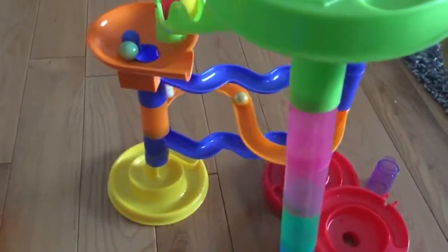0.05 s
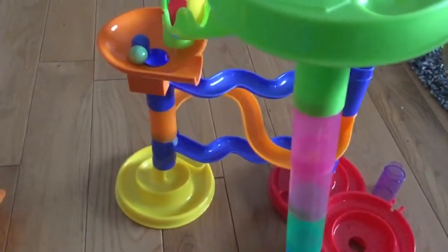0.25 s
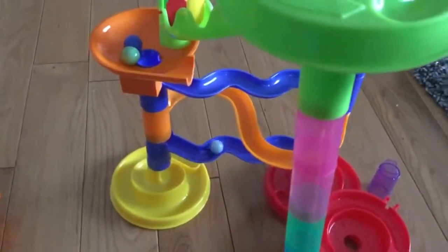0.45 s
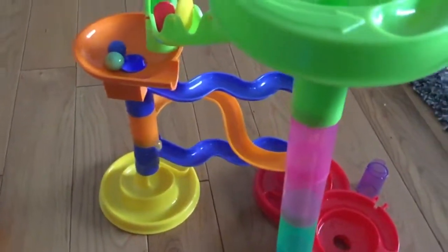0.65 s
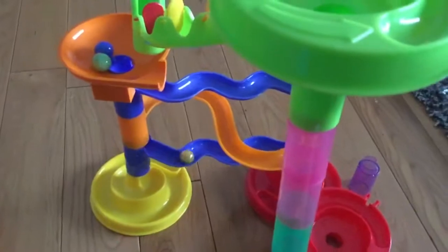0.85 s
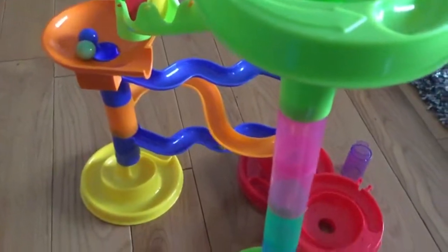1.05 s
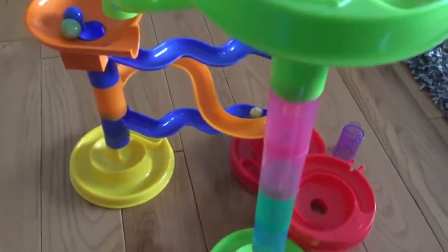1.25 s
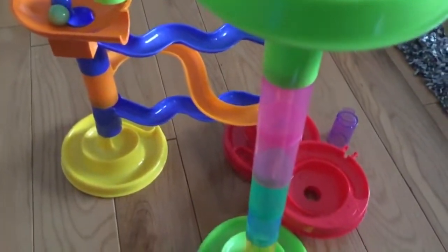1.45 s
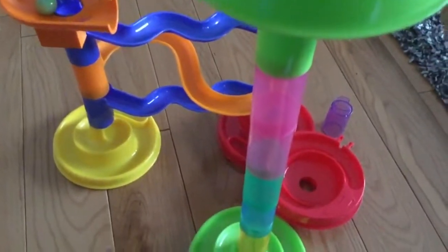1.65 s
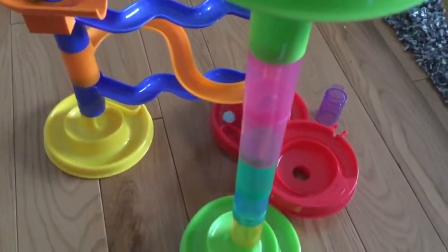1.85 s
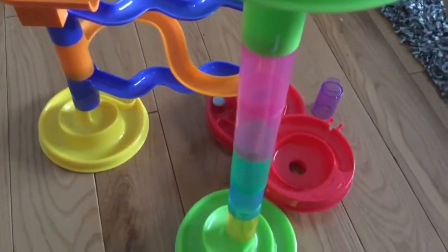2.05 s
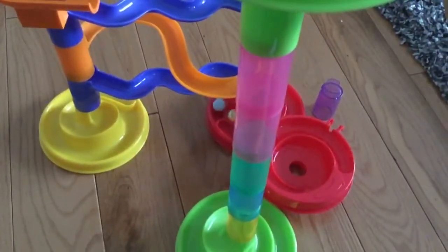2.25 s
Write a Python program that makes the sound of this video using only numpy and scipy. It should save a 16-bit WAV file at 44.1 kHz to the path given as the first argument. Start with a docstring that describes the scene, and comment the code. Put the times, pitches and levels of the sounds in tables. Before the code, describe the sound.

Two glass marbles roll through a plastic run, heard from close above. Sharp clacks on a ramp come at about 0.2 and 0.6 seconds, over soft rolling. The marbles rattle down a hollow column around 1 and 1.4 seconds, then clatter in a dish from 1.5 seconds, settling with a few hollow knocks by about 2.1. The room echoes briefly over a faint low rumble.

```python
"""Two marbles on a plastic track

One after the other, two glass marbles drop onto a wavy ramp, roll along it, rattle down a hollow
column and land in a dish, heard from close above. Each knock makes the thin plastic ring briefly,
and rolling drums it softly. A room with a wooden floor echoes over a low rumble."""
import sys
import numpy as np
from scipy import signal
from scipy.fft import rfft, irfft
from scipy.io import wavfile

SR = 44100
rng = np.random.default_rng(int(sys.argv[2]) if len(sys.argv) > 2 else 0)


def to_wav(sig):
    """Store sig (one row per channel, or 1-D mono) as 16-bit WAV at the path in sys.argv[1].

    Samples outside -1..1 are clipped; the rate is SR.
    """
    pcm = np.clip(np.atleast_2d(sig), -1, 1) * 32767
    pcm = np.round(pcm).astype(np.int16)
    wavfile.write(sys.argv[1], SR, pcm.T)  # frames by channels


N = 101429


def undb(db):
    """Turn decibels into a number to multiply by."""
    return 10 ** (np.asarray(db) / 20)


def unit(x):
    """Scale a sound to an average strength (rms) of 1."""
    return x / np.sqrt(np.mean(x ** 2) + 1e-20)


def fade(t, t60):
    """Die away, falling by 60 dB in the fade time t60."""
    return np.exp(-np.log(1000) * t / t60)


def band(x, lo_hz, hi_hz):
    """Keep the part of a sound between two frequencies."""
    return signal.sosfilt(signal.butter(3, [lo_hz, hi_hz], "band", fs=SR, output="sos"), x)


def colour(x, points):
    """Shape the tone along a curve of (frequency [Hz], level [dB]) points."""
    hz, db = np.array(points).T
    f = np.maximum(np.fft.rfftfreq(len(x), 1 / SR), 1)
    return irfft(rfft(x) * undb(np.interp(np.log(f), np.log(hz), db)), len(x))


# the tone of the still air (frequency [Hz], relative level [dB])
AIR_TONE = [(25, -35.5), (40, -24.5), (56, -5), (72, 6), (92, -9.5), (125, -1), (200, -11.5), (350, -11.5),
            (550, -26), (1200, -26), (3000, -35), (8000, -54.5), (13000, -44), (15000, -72)]


def air_rumble(level_db=-58):
    """The air in the room makes a faint, low, steady noise."""
    return undb(level_db) * unit(colour(rng.standard_normal(N), AIR_TONE))


# the room's echo (frequency [Hz], level against the sound going in [dB], fade time [s])
ROOM_ECHO = [(202, -2, 0.91), (459, -12, 0.55), (800, -10, .43), (1497, -8.5, 0.43), (2780, -10, 0.45),
             (5500, -18.5, 0.73), (8500, -8.5, 0.32), (14000, -19.5, .3)]


def room(x, delay_s=0.0041, build_s=.012, early_db=-14, early_s=0.032):
    """Early echoes bounce off floor and toy, then blur into a tail whose lows last longest."""
    t = np.arange(SR * 3 // 4) / SR
    hz, db, t60 = np.array(ROOM_ECHO).T
    edges = np.geomspace(140, 17000, 15)
    build = 1 - np.exp(-np.maximum(t - delay_s, 0) / build_s)
    f = np.fft.rfftfreq(len(t), 1 / SR)
    spectrum = rfft(rng.standard_normal(len(t)))
    tail = 0
    for lo, hi in zip(edges, edges[1:]):
        log_centre = np.log(lo * hi) / 2
        envelope = unit(build * fade(t, np.interp(log_centre, np.log(hz), t60)))
        noise = irfft(spectrum * ((f >= lo) & (f < hi)), len(t))
        tail += undb(np.interp(log_centre, np.log(hz), db)) * envelope * noise
    early = undb(early_db) * unit(rng.standard_normal(len(t)) * np.sqrt(t) * np.exp(-(t / early_s) ** 2))
    return signal.fftconvolve(x, (tail + early) / np.sqrt(len(t)))[:N]


def resonate(taps, peaks):
    """Tapped plastic rings at its own pitches; filtering twice makes each one stand out."""
    out = 0
    for hz, width, db in peaks:
        b, a = signal.iirpeak(hz, hz / width / 1.17, fs=SR)
        out += undb(db) * unit(signal.lfilter(b, a, signal.lfilter(b, a, taps)))
    return unit(out)


# how loud the rolling is (time [s], low ring level [dB], middle ring level [dB])
ROLL_LEVELS = [(0, -50.5, -51), (.18, -52.5, -60), (.4, -51.5, -54), (0.492, -45.5, -49), (.54, -54.5, -55),
               (.7, -45.5, -50.5), (.9, -51.5, -56), (1.08, -46, -45), (1.22, -51.5, -55),
               (1.275, -43, -62), (1.315, -54, -62.5), (1.345, -50, -54), (1.45, -54, -64),
               (1.6, -42.5, -46.5), (1.78, -54.5, -50), (1.88, -53.5, -61.5), (2.0, -44, -38),
               (2.11, -44.5, -69.5), (2.18, -63.5, -65), (2.3, -70, -81.5)]
# the low and middle rings of the plastic (pitch [Hz], rough width [Hz], relative level [dB])
LOW_RING = [(788.6, 112, 3.5), (706, 110, -11)]
MIDDLE_RING = [(1015, 54, 4), (1357, 196, 11.5), (1515, 350, 8), (2313, 410, 2)]
# the tone of the rolling hiss (frequency [Hz], relative level [dB])
HISS_TONE = [(1500, -16), (2600, 4.5), (4500, -3.5), (7500, -6.5), (10000, -12.5), (13000, -21.5),
             (15000, -47)]


def rolling(taps_per_s=1200, spread_db=3, hiss_db=-10.5):
    """Tiny uneven taps under the rolling marbles drum the plastic and hiss faintly."""
    t = np.arange(N) / SR
    times, low_db, middle_db = np.array(ROLL_LEVELS).T
    sizes = undb(spread_db * np.minimum(rng.exponential(size=N), 4))
    taps = (rng.random(N) < taps_per_s / SR) * sizes * rng.choice([-1, 1], N)
    hiss = undb(hiss_db) * unit(colour(unit(taps) + rng.standard_normal(N), HISS_TONE))
    low = undb(np.interp(t, times, low_db)) * resonate(taps, LOW_RING)
    middle = undb(np.interp(t, times, middle_db)) * (resonate(taps, MIDDLE_RING) + hiss)
    return low + middle


# the dish's low notes (time [s], pitch [Hz], level [dB], fade time [s])
DISH_BOOMS = [(1.986, 326, -33.5, 0.049), (2.025, 294, -37, 0.16), (2.112, 800, -24.5, 0.049)]


def dish_booms(swell_s=0.003):
    """As the second marble settles, low notes of the dish swell and die away."""
    out = 0
    for start, hz, db, t60 in DISH_BOOMS:
        age = np.maximum(np.arange(N) / SR - start, 0)
        swell = 1 - np.exp(-age / swell_s)
        out += undb(db) * swell * fade(age, t60) * np.sin(2 * np.pi * hz * age)
    return out


# the borders of a knock's four bands, called low, middle, treble and top (frequency [Hz])
BAND_BORDERS = [200, 1000, 2700, 6300, 16000]
# the crack of many short-lived notes, a row per band (level against the ring [dB], fade time [s])
KNOCK_CRACK = [(-17.5, .014), (-5.5, 0.013), (-4, 0.01), (-1.5, 0.011)]
# the range of crack and click, a row per band (from [Hz], to [Hz])
CRACK_RANGES = [(350, 1030), (1000, 2300), (2700, 5580), (6000, 11400)]


def knock(levels_db, notes, clicks_db, attack_s=0.00036, lag_at_1khz_s=0.000325):
    """A marble hits the plastic: a click, a short crack and the ring of that part's own notes."""
    t = np.arange(SR // 8) / SR
    hz, db, t60 = np.array(notes).T
    note_band = np.searchsorted(BAND_BORDERS, hz) - 1
    hz = hz * (1 + .018 * rng.standard_normal(len(hz)))  # no two knocks ring quite alike
    gain = undb(db + 1.5 * rng.standard_normal(len(hz))) * rng.choice([-1, 1], len(hz))
    out = 0
    for k, (crack_db, crack_t60) in enumerate(KNOCK_CRACK):
        lo, hi = BAND_BORDERS[k:k + 2]
        lag_s = lag_at_1khz_s * 1000 / np.sqrt(lo * hi)  # low bending waves travel more slowly
        age = np.maximum(t - lag_s, 0)
        rise = 1 - np.exp(-age / attack_s)
        in_band = note_band == k
        tones = np.sin(2 * np.pi * hz[in_band, None] * age) * fade(age, t60[in_band, None])
        ring = unit(rise * (gain[in_band] @ tones))
        burst = rng.standard_normal(len(t)) * rise * fade(age, crack_t60)
        crack = undb(crack_db) * unit(band(burst, *CRACK_RANGES[k]))
        spike = signal.unit_impulse(len(t), np.argmax(age > 0)) * rng.choice([-1, 1])
        click = undb(clicks_db[k]) * unit(band(spike, *CRACK_RANGES[k]))
        out += undb(levels_db[k]) * unit(ring + crack + click)
    return out * np.sqrt(.008 * SR / len(t))  # levels count as if the knock were packed into 8 ms


def knocks(hits, notes, clicks_db):
    """All the knocks on one part; where and how hard a marble hits sets the four band levels."""
    out = np.zeros(N + SR)
    for start, *levels_db in hits:
        sound = knock(levels_db, notes, clicks_db)
        i = int(start * SR)
        out[i:i + len(sound)] += sound
    return out[:N]


# knocks on the ramp (time [s], low [dB], middle [dB], treble [dB], top [dB])
RAMP_HITS = [(0.0275, -46, -54, -55, -59), (0.1472, -46, -45, -58, -69), (0.2351, -25, -24, -17, -25),
             (0.2569, -30, -32, -36, -44), (0.2929, -39, -39, -34, -38), (0.4881, -48, -47, -61, -72),
             (0.5545, -29, -34, -41, -44), (0.5949, -24, -25, -18, -29), (0.6099, -28, -30, -27, -31),
             (0.6459, -32, -31, -39, -46), (0.6673, -35, -39, -49, -55), (0.8781, -43, -43, -54, -63),
             (1.267, -42, -54, -68, -72)]
# the ramp's own notes (pitch [Hz], relative level [dB], fade time [s])
RAMP_NOTES = [(392, -15, 0.045), (798, 8, 0.035), (1120, 7.5, 0.012), (1419, 0, 0.017), (1930, -10, 0.0047),
              (2416, -5, 0.037), (2914, -2, 0.017), (4200, 6, 0.0079), (4990, 3, .011), (5683, 10, 0.0075),
              (6670, 5, 0.0097), (8200, 5, .008)]


def ramp(clicks_db):
    """The marbles drop onto the wavy ramp and bump along it."""
    return knocks(RAMP_HITS, RAMP_NOTES, clicks_db)


# knocks in the column (time [s], low [dB], middle [dB], treble [dB], top [dB])
COLUMN_HITS = [(0.1203, -50, -50, -62, -59), (0.1386, -57, -58, -55, -64), (0.202, -39, -35, -34, -36),
               (0.5517, -43, -40, -36, -35), (0.5768, -38, -33, -35, -34), (0.9171, -40, -34, -38, -38),
               (0.9368, -48, -35, -45, -47), (0.9583, -30, -23, -28, -29), (0.976, -47, -37, -45, -46),
               (0.9875, -48, -36, -46, -47), (1.0109, -35, -33, -35, -30), (1.042, -36, -34, -39, -39),
               (1.0605, -44, -36, -52, -50), (1.0638, -37, -33, -40, -42), (1.1044, -38, -34, -49, -47),
               (1.1837, -48, -43, -57, -68), (1.3866, -65, -42, -60, -60), (1.3942, -34, -34, -37, -39),
               (1.4101, -58, -37, -49, -55), (1.4215, -39, -39, -46, -47), (1.4266, -27, -20, -28, -29),
               (1.4435, -38, -36, -43, -43), (1.4565, -44, -34, -45, -44)]
# the column's own notes (pitch [Hz], relative level [dB], fade time [s])
COLUMN_NOTES = [(400, -20, 0.054), (656, 0.5, 0.027), (800, 1.5, 0.027), (1170, -5.5, .02),
                (1323, 3, 0.019), (2218, -5, 0.023), (3317, 1, 0.0094), (4160, -4.5, 0.016),
                (5345, -2, 0.021), (6180, 3.5, 0.01), (7520, -9, 0.01), (8570, -16.5, 0.011)]


def column(clicks_db):
    """The marbles rattle down the hollow column and make its walls ring."""
    return knocks(COLUMN_HITS, COLUMN_NOTES, clicks_db)


# knocks in the dish (time [s], low [dB], middle [dB], treble [dB], top [dB])
DISH_HITS = [(1.476, -34, -35, -37, -33), (1.4928, -44, -37, -30, -29), (1.5036, -47, -32, -36, -37),
             (1.5116, -39, -32, -33, -34), (1.5245, -50, -36, -43, -43), (1.5335, -42, -40, -49, -43),
             (1.5749, -41, -32, -41, -48), (1.6202, -42, -43, -63, -65), (1.6298, -35, -34, -40, -45),
             (1.646, -48, -41, -52, -62), (1.7013, -40, -42, -55, -60), (1.7296, -37, -33, -42, -46),
             (1.7498, -47, -43, -58, -70), (1.8158, -45, -39, -52, -54), (1.8526, -47, -46, -75, -78),
             (1.8803, -52, -46, -64, -73), (1.9131, -42, -36, -42, -41), (1.9388, -34, -34, -43, -43),
             (1.9548, -39, -38, -48, -38), (1.966, -36, -38, -56, -59), (1.9828, -33, -36, -33, -31),
             (1.9927, -43, -31, -38, -39), (1.9979, -49, -41, -35, -35), (2.0102, -35, -33, -50, -46),
             (2.0474, -40, -45, -58, -64), (2.1144, -35, -46, -62, -65)]
# the dish's own notes (pitch [Hz], relative level [dB], fade time [s])
DISH_NOTES = [(335, -25.5, 0.13), (805, 6, 0.034), (1355, -2.5, 0.023), (1577, -6, 0.038), (2355, -7, 0.03),
              (3410, 5, 0.0093), (3910, 9, 0.0057), (5350, 1, 0.011), (7100, -6, 0.0051),
              (8330, -4, 0.0045), (9900, -12.5, 0.0044)]


def dish(clicks_db):
    """The marbles land in the dish and clatter against it."""
    return knocks(DISH_HITS, DISH_NOTES, clicks_db)


# the click in each band (level against the ring [dB]): faint up close,
# strong in the room, which hears the plastic from all sides
CLOSE_CLICKS = [-16, -12, -11.5, -10.5]
ROOM_CLICKS = [-7, 4, 9, 9]
# how much the room hears of ramp, column and dish (level [dB])
ROOM_SHARES = [-1.5, 0, -1]


def scene():
    """Knocks and rolling, heard directly and as echoes, over the faint rumble."""
    rumble = air_rumble()
    drumming = rolling() + dish_booms()
    parts = ramp, column, dish
    close_knocks = sum(part(CLOSE_CLICKS) for part in parts)
    room_knocks = sum(undb(db) * part(ROOM_CLICKS) for part, db in zip(parts, ROOM_SHARES))
    return (rumble + room(room_knocks + drumming) + drumming + close_knocks)[None]


def record(dry, top_hz=16500):
    """The treble is softened near 11 kHz, lifted near 16 kHz, and the very top is cut off."""
    shaped = colour(dry[0], [(9000, 0.5), (11000, -7), (13000, 0), (16000, 3.5)])
    return signal.sosfilt(signal.ellip(10, .2, 90, top_hz, fs=SR, output="sos"), shaped)[None]


dry = scene()
out = record(dry)
to_wav(out)
```